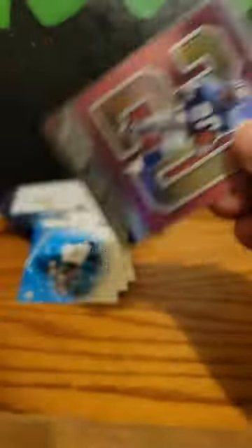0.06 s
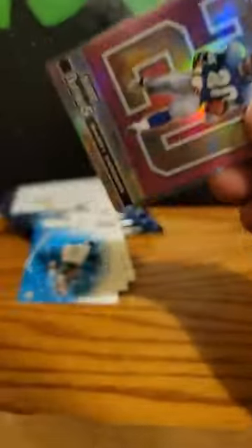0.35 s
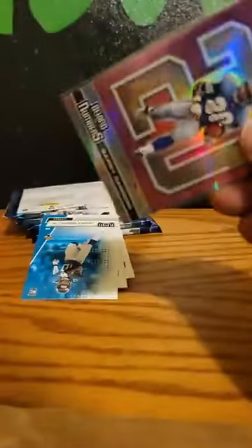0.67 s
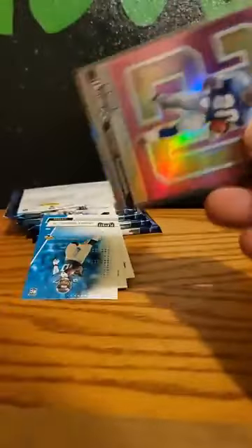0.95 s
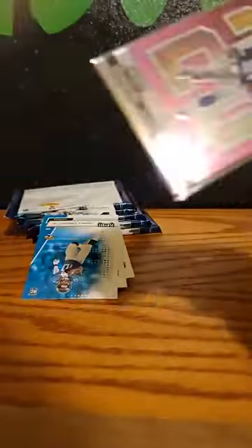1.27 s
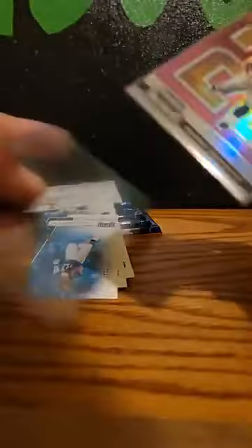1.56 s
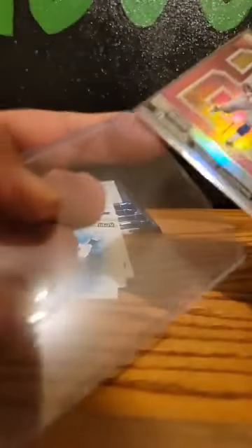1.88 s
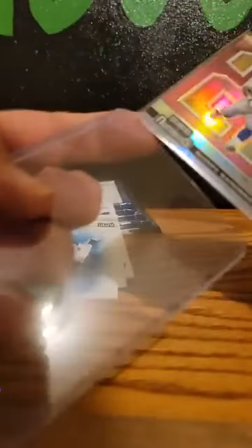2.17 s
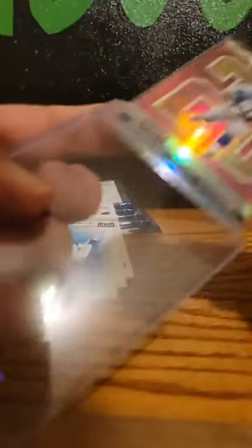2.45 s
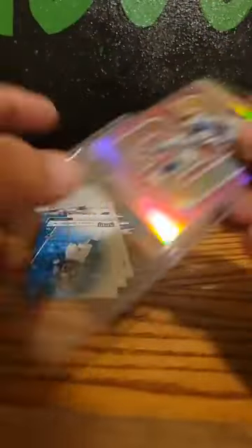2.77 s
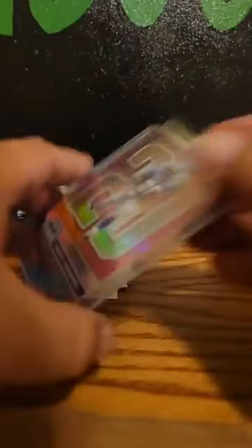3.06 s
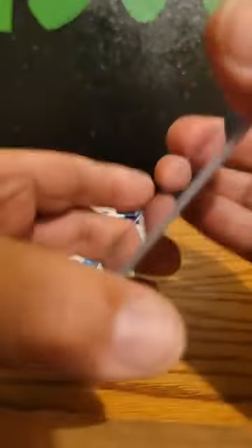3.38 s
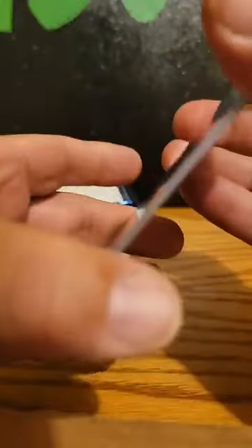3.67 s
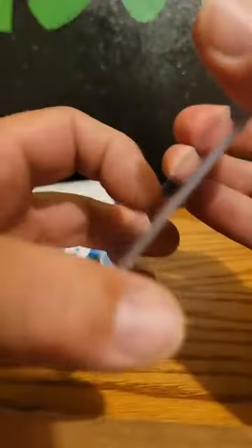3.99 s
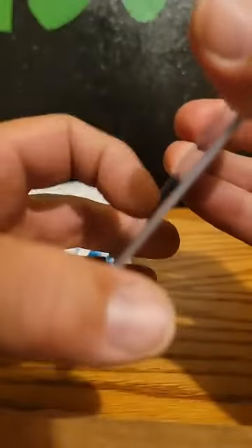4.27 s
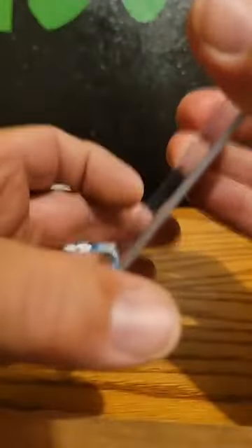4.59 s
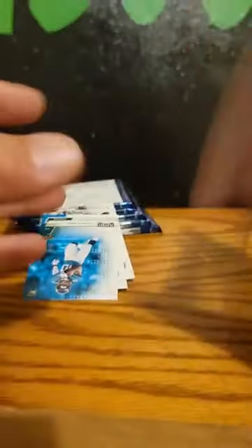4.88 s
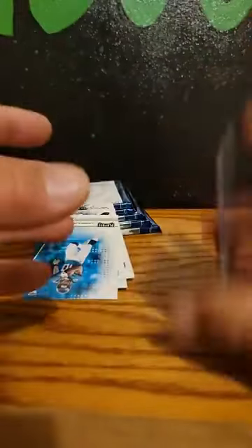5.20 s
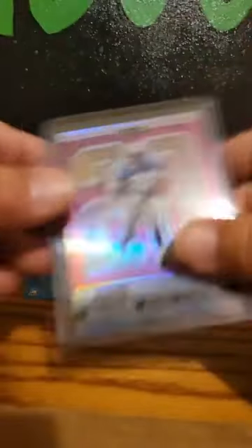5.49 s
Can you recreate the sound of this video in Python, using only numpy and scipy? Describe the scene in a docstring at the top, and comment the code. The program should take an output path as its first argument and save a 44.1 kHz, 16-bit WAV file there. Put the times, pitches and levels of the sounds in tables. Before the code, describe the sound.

A faint fan runs in a small room while fingers handle a card and its plastic holder right by the microphone. Soft rubbing, two brisk plastic swishes and some muffled knocks come first, then scattered little clicks and short scrapes as the card slides in. Two sharp raps of the holder on a wooden desk are the loudest sounds, each with a short room echo, and a soft fingertip thud follows.

```python
"""In a small room with a fan running, hands slide a sleeved trading card into a stiff plastic holder,
close to a phone. Plastic rubbing on plastic hisses and swishes, fingertips rub and squeak, the hand
bumps the desk, and the card's corners catch with tiny ticks. Then the holder is rapped twice on the
wooden desk to seat the card. The raps ring through the room and make the phone turn its gain down."""
import sys
import numpy as np
from scipy import signal
from scipy.fft import rfft, irfft, next_fast_len
from scipy.io import wavfile
from scipy.ndimage import uniform_filter1d

SR = 44100
rng = np.random.default_rng(int(sys.argv[2]) if len(sys.argv) > 2 else 0)


def inscribe(sig):
    """Save sig as 16-bit PCM at rate SR to the path in sys.argv[1].

    A 1-D sig is mono; a 2-D sig holds one channel per row.
    Samples are clipped to [-1, 1] before scaling.
    """
    pcm = np.round(np.clip(np.atleast_2d(sig).T, -1, 1) * 32767)
    wavfile.write(sys.argv[1], SR, pcm.astype(np.int16))


N = 248635

# Levels are relative. A fade time is how long a sound takes to drop by 60 dB.
# The tone colour of each sound. Each row: frequency in Hz, level in dB.
FAN_COLOUR = [(15, -54.5), (25, -37), (39, -13), (60, 3.5), (93, -22), (135, 2), (171, -13), (241, -5),
              (305, -13), (376, -4), (418, -7), (452, -6), (874, -19.5), (1780, -20), (8190, -41),
              (12500, -43), (13500, -66)]
SLEEVE_COLOUR = [(2000, -26), (5000, 1.5), (7500, 5), (10000, 7), (12500, 11.5), (14000, -28)]
FINGER_COLOUR = [(100, -43.5), (500, 14), (1000, -2), (2200, 7), (3300, 7.5), (4500, 2), (7000, -5.5),
                 (10000, -22)]
HAND_COLOUR = [(25, -16), (55, 8.5), (95, -9.5), (135, 5.5), (250, -9.5), (600, -7.5), (1500, -15),
               (4000, -35.5)]
SWISH_COLOUR = [(50, -4), (130, -8.5), (400, 6), (950, 1.5), (1800, 3), (3000, 2), (4300, 3), (6500, -2),
                (9000, -14), (12500, -8.5), (14000, -21)]
BUMP_COLOUR = [(25, -27.5), (55, -9), (130, 4), (300, -5), (550, -1), (820, -1), (1200, -8), (6000, -1)]
TICK_COLOUR = [(200, -7), (1000, -25), (2300, 0), (4000, -1), (7000, -3), (10000, 0), (12500, 1.5),
               (14000, -20.5)]
RAP_COLOUR = [(40, -17.5), (110, -2.5), (170, 0.5), (400, 2), (750, -1.5), (900, 2.5), (1200, -1),
              (1700, 3.5), (2700, 0.5), (4000, -5), (5500, -18), (7200, -17.5), (9000, -27.5),
              (11000, -8.5), (13500, -28)]
# The fan's droning notes. Each row: pitch in Hz, half width in Hz, level in dB.
FAN_DRONES = [(56, 4, -64), (134.7, 6.7, -54.5), (191, 12, -60), (383, 24, -53)]
# Pushes of the card. Each row: peak time in seconds, sleeve hiss in dB, finger rub in dB,
# rise and fall in seconds.
PUSHES = [(0.095, -63.5, -55.5, 0.11, .22), (0.21, -66.5, -50.5, 0.28, 0.49),
          (0.69, -58, -46.5, 0.084, 0.084), (0.819, -58, -40.5, 0.1, 0.12),
          (0.98, -47.5, -45.5, 0.15, 0.32), (1.2, -57.5, -54, 0.43, 0.68), (1.48, -63, -63, .15, 0.36),
          (2.57, -53, -51, 0.12, 0.17), (2.645, -44.5, -52.5, .035, 0.13), (2.78, -39, -47.5, 0.029, 0.042),
          (3.085, -50.5, -51, .2, .1), (3.132, -42, -44.5, 0.074, 0.052), (3.228, -41, -42, 0.023, 0.043),
          (4.3, -75, -57, 0.46, .9), (4.76, -59, -55, 0.067, 0.27)]
# The hand brushes the desk. Each row: peak time in seconds, level in dB, rise and fall in seconds.
HAND_MOVES = [(0.2, -47.5, 0.39, 1.5), (0.87, -39, 1, 0.81), (3.1, -48.5, 0.56, .4)]
# A fingertip lands on the holder (thuds) or sticks and slips on it (squeaks).
# Each row: peak time in seconds, pitch in Hz, level in dB, half length in seconds.
THUDS = [(5.52, 125, -24, .0035)]
SQUEAKS = [(0.21, 3200, -49, 0.014), (0.246, 3180, -50, 0.008)]
# Plastic whisks over plastic. Each row: start in seconds, level in dB, fade time in seconds,
# treble tilt in dB per octave, extra level of the snap in dB.
SWISHES = [(0.455, -20.5, 0.22, -1, 10), (1.291, -21.5, 0.14, 3, 6)]
# Soft bumps. Each row: start in seconds, level in dB, fade time in seconds, treble cutoff in Hz.
BUMPS = [(0.459, -37.5, 0.57, 248), (0.759, -33, 0.27, 450), (0.778, -28.5, 0.21, 600),
         (0.810, -20, 0.086, 1000), (1.017, -33.5, 0.079, 1000), (2.747, -33, 0.059, 1100)]
# Card corners catch. Each row: start in seconds, level in dB, treble tilt in dB per octave.
TICKS = [(1.3, -18.5, 1), (1.981, -46.5, -3), (2.318, -35, -3.5), (2.743, -26.5, -9), (2.751, -31, -8),
         (2.767, -26, 6), (2.779, -29, 1), (3.081, -33, 1), (3.109, -33, -5), (3.127, -28, 4),
         (4.052, -29, -12), (4.091, -29.5, 1.5), (5.399, -35, -4)]
# The holder hits the desk; the last two hits merge into one rap.
# Each row: start in seconds, level in dB, treble cutoff in Hz.
RAP_HITS = [(4.949, -15.5, 11100), (5.1920, -10.5, 2040), (5.201, -9.5, 12300)]
# The stiff holder's clack. Each row: pitch in Hz, width in Hz, boost in dB.
HOLDER_PEAKS = [(888, 88, 1), (1557, 110, 7), (2150, 110, 1.5), (2540, 150, 5.5), (3110, 110, 3)]
# The notes desk and room ring with. Each row: pitch in Hz, level in dB, fade time in seconds.
RING_NOTES = [(170.6, 20.5, 0.095), (204, 10, 0.12), (257, 15.5, 0.19), (382, 9, 0.29), (533, 8.5, .2),
              (610, 1, 0.36), (866, 6, 0.13), (926, 3, 0.1), (1013, 10.5, 0.2), (2237, 6, 0.45),
              (2610, 1, 0.47)]
# First echoes off the walls. Each row: delay in seconds, level in dB.
WALL_ECHOES = [(.0029, -13), (.0046, -6.5), (.0082, -0.5), (0.01, -1), (0.0148, 3.5), (0.0271, -6),
               (.0337, -20)]
# How long the room rings. Each row: frequency in Hz, fade time in seconds.
ROOM_FADES = [(100, 0.3), (600, 0.29), (2000, 0.32), (5500, 0.36), (12000, 0.27)]
# How alike left and right are. Each row: frequency in Hz, likeness from 0 (unrelated) to 1 (the same).
STEREO_LIKENESS = [(100, 0.958), (350, 1), (650, 0.31), (1100, 0.033), (3000, 0.013)]


def amp(db):
    """Turn decibels into a gain."""
    return 10 ** (np.asarray(db) / 20)


def unit(x):
    """Scale a sound to an average power of 1."""
    return x / np.sqrt(np.mean(x ** 2) + 1e-20)


def along(points, hz):
    """Read between (Hz, value) points on a log frequency axis."""
    freqs, values = np.transpose(points)
    return np.interp(np.log(hz + 1), np.log(freqs + 1), values)


def filtered(x, response):
    """Scale each frequency of x by response(hz)."""
    n = x.shape[-1]
    padded = next_fast_len(n + 8192)
    return irfft(rfft(x, padded) * response(np.fft.rfftfreq(padded, 1 / SR)), padded)[..., :n]


def soft(hz, cutoff_hz):
    """A soft contact makes little sound above its cutoff."""
    return 1 / np.sqrt(1 + (hz / cutoff_hz) ** 6)


def add(track, s, sound):
    """Mix a sound in at s seconds."""
    part = track[..., round(s * SR):][..., :sound.shape[-1]]
    part += sound[..., :part.shape[-1]]


def pan(right_db):
    """Left and right gains, with the right louder by right_db."""
    return amp(np.array([[-.5], [.5]]) * right_db)


def diffuse(pair):
    """Blend two unrelated signals as two microphones hear them: alike in the bass only."""
    angle = lambda hz: np.arccos(np.clip(along(STEREO_LIKENESS, hz), -1, 1)) / 2
    mid, side = filtered(pair, lambda hz: np.array([np.cos(angle(hz)), np.sin(angle(hz))]))
    return np.array([mid + side, mid - side])


def friction(response, grain_db, size=N):
    """Rubbing noise made of millisecond slips; more grain_db makes them more uneven."""
    slips = unit(uniform_filter1d(rng.standard_normal(size), size=60))
    noise = rng.standard_normal((2, size)) * amp(grain_db * slips)
    return unit(filtered(diffuse(noise), response))


def scrape(response, fade_s, rise_s, grain_db):
    """A brief burst of friction that swells and dies."""
    t = np.arange(SR // 2) / SR
    return friction(response, grain_db, size=len(t)) * (1 - np.exp(-t / rise_s)) * amp(-60 * t / fade_s)


def swell(peak_s, rise_s, fall_s, depth_db=20):
    """A movement gains depth_db over its rise and loses as much over its fall."""
    t = np.arange(N) / SR - peak_s
    return amp(-depth_db * np.maximum(-t / rise_s, t / fall_s))


def room(x, build_s=0.0079):
    """The room's wash of echoes builds up, then each frequency dies at its own speed."""
    hz, t, spectra = signal.stft(diffuse(rng.standard_normal((2, SR // 2))), SR, nperseg=256)
    tail = signal.istft(spectra * amp(-60 * t / along(ROOM_FADES, hz)[:, None]), SR, nperseg=256)[1]
    tail *= 1 - np.exp(-(np.arange(tail.shape[1]) / SR / build_s) ** 2)
    return signal.fftconvolve(x[None], tail / np.linalg.norm(tail[0]), axes=1)[:, :N]


def fan(air_db=-45.5):
    """The fan makes a steady rush of air with a few droning notes."""
    noise = lambda response: unit(filtered(diffuse(rng.standard_normal((2, N))), response))
    air = amp(air_db) * noise(lambda hz: amp(along(FAN_COLOUR, hz)))
    drone = sum(amp(db) * noise(lambda hz: 1 / (1 + ((hz - pitch) / width) ** 2))
                for pitch, width, db in FAN_DRONES)
    right_db = [(150, 0.9), (400, 1.8), (900, 6.0), (10000, 1.5)]  # the fan stands to the right
    return filtered(air + drone, lambda hz: pan(along(right_db, hz)))


def sliding(sleeve_db=1, finger_db=-1, room_db=-10):
    """The thin sleeve hisses as it slides; fingertips rub with a duller sound."""
    hiss = pan(2.0) * friction(lambda hz: amp(along(SLEEVE_COLOUR, hz)), grain_db=1.5)
    rub = pan(6.5) * friction(lambda hz: amp(along(FINGER_COLOUR, hz)), grain_db=2.0)
    pushes = [amp([[hiss_db], [rub_db]]) * swell(s, rise, fall)
              for s, hiss_db, rub_db, rise, fall in PUSHES]
    slide, press = np.linalg.norm(pushes, axis=0)  # overlapping pushes add in power
    out = amp(sleeve_db) * slide * hiss + amp(finger_db) * press * rub
    return out + amp(room_db) * room(out[0])


def handling():
    """The moving hand makes a low rustle, and a fingertip lands on the holder with a soft thud."""
    t = np.arange(N) / SR
    moves = [amp(db) * swell(s, rise, fall) for s, db, rise, fall in HAND_MOVES]
    rustle = friction(lambda hz: amp(along(HAND_COLOUR, hz)), grain_db=2.5)
    out = np.linalg.norm(moves, axis=0) * rustle
    for s, hz, db, half in THUDS:
        out += amp(db) * np.exp(-((t - s) / half) ** 2 / 2) * np.sin(2 * np.pi * hz * (t - s))
    return pan(2.0) * out


def squeaks():
    """A fingertip sticks and slips on the plastic with a faint, unsteady whistle."""
    t = np.arange(N) / SR
    whistle = lambda pitch: friction(lambda hz: np.exp(-((hz - pitch) / 60) ** 2), grain_db=-6)
    return sum(amp(db) * np.exp(-((t - s) / half) ** 2 / 2) * whistle(pitch)
               for s, pitch, db, half in SQUEAKS)


def swishes(direct_db=-6, room_db=-1, snap_fade_s=0.023):
    """Plastic whisks along and snaps free, off to the right, heard mostly by way of the room."""
    out = np.zeros((2, N))
    for s, db, fade_s, tilt, snap_db in SWISHES:
        colour = lambda hz: amp(along(SWISH_COLOUR, hz) + tilt * np.log2(np.maximum(hz, 1000) / 2000))
        add(out, s, amp(db) * scrape(colour, fade_s, rise_s=0.0019, grain_db=4.5))
        snap = scrape(colour, snap_fade_s, rise_s=0.0021, grain_db=8.0)
        add(out, s + 0.0074, amp(db + snap_db) * snap)
    heard = amp(direct_db) * out + amp(room_db) * room(out[0])
    right_db = [(150, 0.79), (1500, 3.0), (5000, 4.5), (11000, 6.0)]
    return filtered(heard, lambda hz: pan(along(right_db, hz)))


def bumps(room_db=-10):
    """Hand and card knock dully against the desk."""
    out = np.zeros((2, N))
    for s, db, fade_s, cutoff_hz in BUMPS:
        colour = lambda hz: amp(along(BUMP_COLOUR, hz)) * soft(hz, cutoff_hz)
        add(out, s, amp(db) * scrape(colour, fade_s, rise_s=.002, grain_db=2))
    return pan(2.1) * (out + amp(room_db) * room(out[0]))


def ticks(fade_s=0.021, room_db=-9):
    """Card corners catch on the holder's lips: tiny scrapes right at the microphone."""
    out = np.zeros((2, N))
    for s, db, tilt in TICKS:
        colour = lambda hz: amp(along(TICK_COLOUR, hz) + tilt * np.log2(np.maximum(hz, 1000) / 4000))
        add(out, s, amp(db) * scrape(colour, fade_s, rise_s=.001, grain_db=3))
    return out + amp(room_db) * room(out[0])


def clack(cutoff_hz, size=4096):
    """One hit: a short pulse with the desk's broad colour, boosted where the holder rings."""
    hz = np.fft.rfftfreq(size, 1 / SR)
    holder_db = sum(db / (1 + (2 * (hz - pitch) / width) ** 2) for pitch, width, db in HOLDER_PEAKS)
    spectrum = amp(along(RAP_COLOUR, hz) + holder_db) * soft(hz, cutoff_hz)
    # Keep this spectrum but pack its energy as early as possible (minimum phase).
    cepstrum = irfft(np.log(np.maximum(spectrum, 1e-6)))
    cepstrum[1:size // 2] *= 2
    cepstrum[size // 2 + 1:] = 0
    pulse = irfft(np.exp(rfft(cepstrum)))
    return pulse / np.linalg.norm(pulse)


def chatter(fade_s=.009):
    """The holder's edge rattles briefly, equally strong at every frequency."""
    t = np.arange(SR // 8) / SR
    spectrum = rfft(rng.standard_normal(len(t)) * amp(-60 * t / fade_s), SR)
    return irfft(spectrum / np.abs(spectrum), SR)[:len(t)]


def raps(level_db=35, ring_db=-50, near_db=-13.5):
    """The holder clacks on the desk; desk and room ring on and the walls throw the clack back."""
    hits, ring = np.zeros(N), np.zeros((2, N))
    t = np.arange(SR // 2) / SR
    onset = 1 - np.exp(-(t / 0.013) ** 2)  # the low boom swells as the room's resonances build up
    for s, db, cutoff_hz in RAP_HITS:
        add(hits, s, amp(db) * signal.fftconvolve(chatter(), clack(cutoff_hz)))
        for hz, note_db, fade_s in RING_NOTES:
            phase = 2 * np.pi * hz * (s + t) + rng.normal(0, min(hz / 900, 2), (2, 1))
            add(ring, s, amp(db + ring_db + note_db - 60 * t / fade_s) * onset * np.sin(phase))
    near = hits * pan(7)
    for delay, db in WALL_ECHOES:
        for side, gain in zip(near, pan(9.3)):  # an echo reaches each side at a slightly different time
            add(side, delay + rng.normal(0, .0001), gain * amp(db) * hits)
    right_db = [(150, 1), (500, 4), (2000, 2.0), (5000, 2.9), (11000, 4.9)]  # the phone shades its left
    far = filtered(ring + room(hits, build_s=.01), lambda hz: pan(along(right_db, hz)))
    return amp(level_db) * (amp(near_db) * near + far)


def gain_control(x, ceiling_db=-13, recovery_db_per_s=3.0):
    """Loud sound turns the phone's gain down at once; then it creeps back up."""
    power = np.abs(uniform_filter1d(np.mean(x ** 2, axis=0), size=500))
    excess_db = np.maximum(10 * np.log10(power + 1e-12) - ceiling_db, 0)
    creep_db = recovery_db_per_s * np.arange(N) / SR
    return x * amp(creep_db - np.maximum.accumulate(excess_db + creep_db))


def scene():
    """All the sounds together, in stereo."""
    return raps() + swishes() + bumps() + handling() + ticks() + sliding() + squeaks() + fan()


def record(dry, notch_hz=8300, notch_width_hz=650, notch_db=-17, top_hz=13300):
    """The microphone opening dulls one narrow band; the phone tames peaks and cuts the top treble."""
    coloured = filtered(dry, lambda hz: amp(notch_db * np.exp(-((hz - notch_hz) / notch_width_hz) ** 2)))
    clipped = np.clip(gain_control(coloured), -.95, .95)
    return filtered(clipped, lambda hz: 1 / np.sqrt(1 + (hz / top_hz) ** 160))


dry = scene()
out = record(dry)
inscribe(out)
```